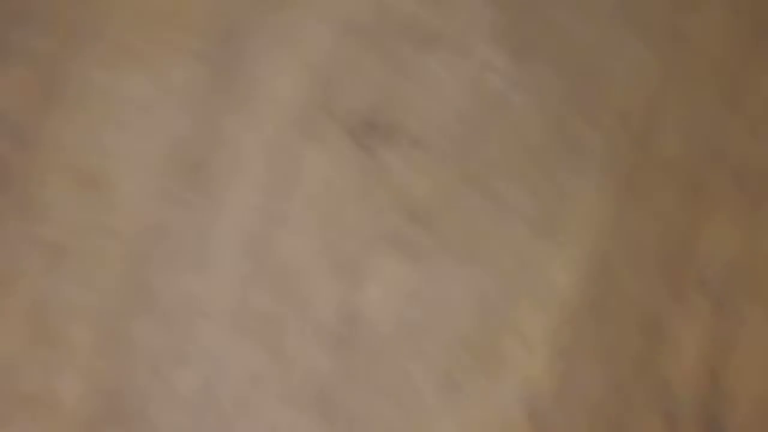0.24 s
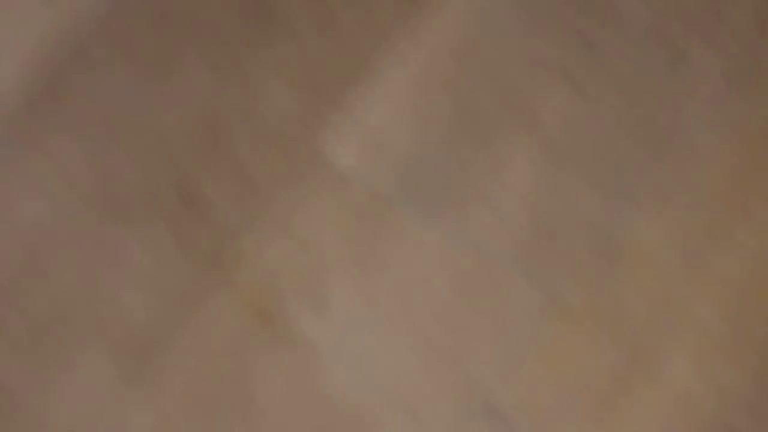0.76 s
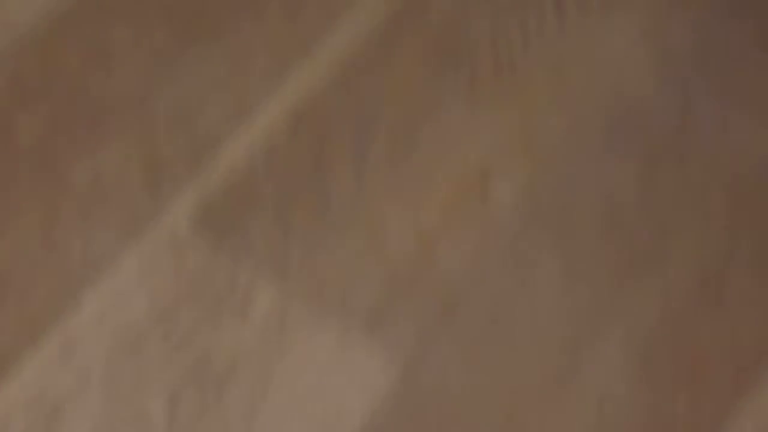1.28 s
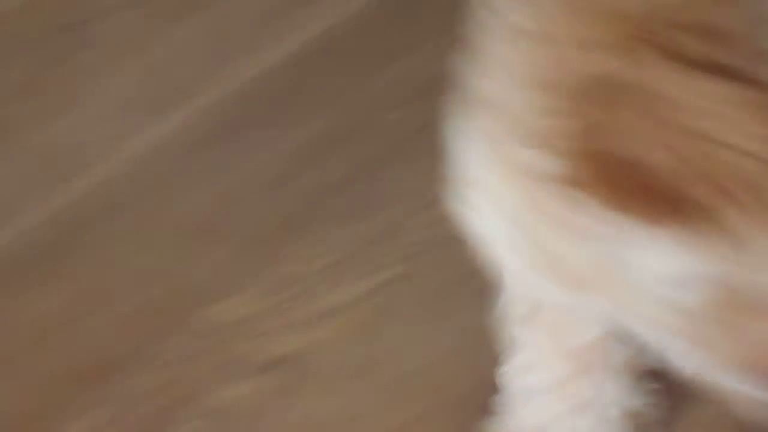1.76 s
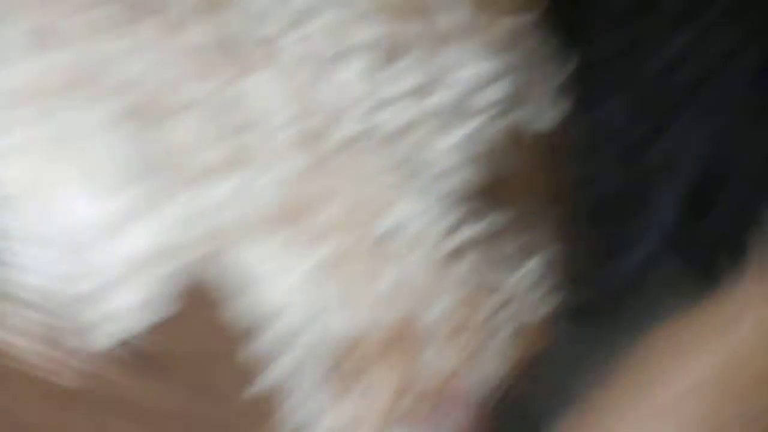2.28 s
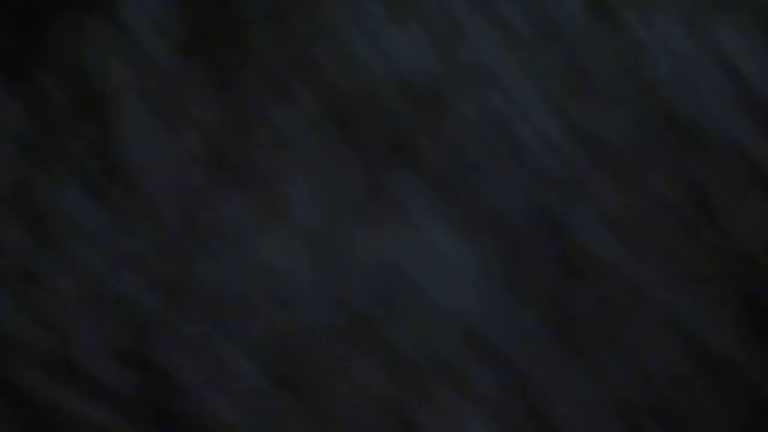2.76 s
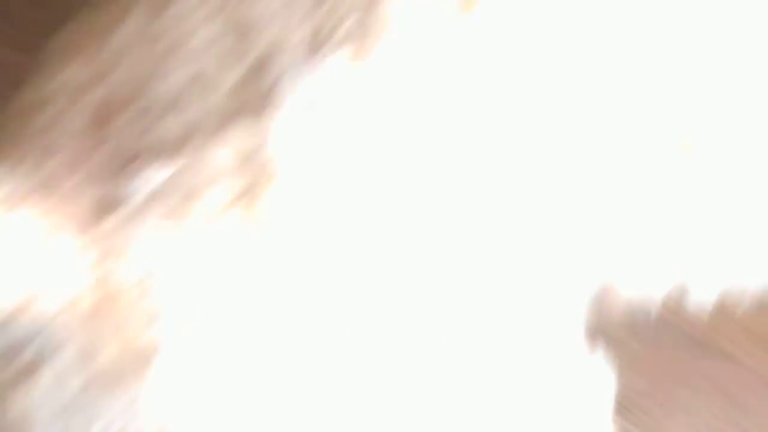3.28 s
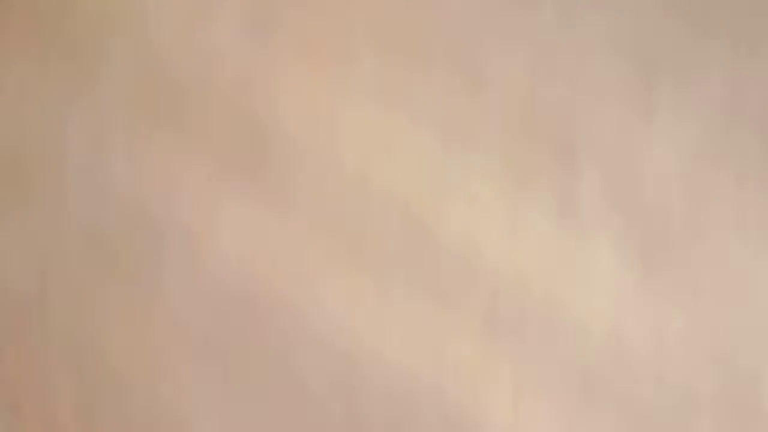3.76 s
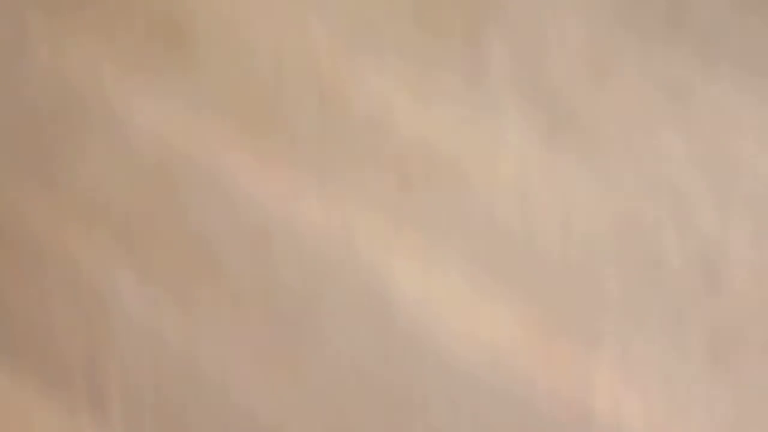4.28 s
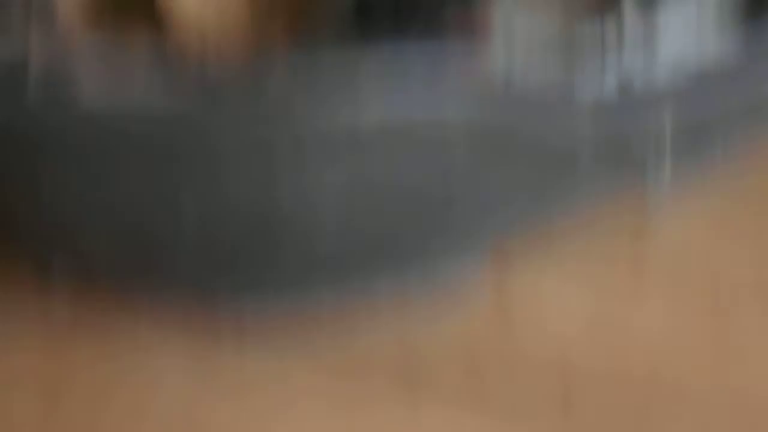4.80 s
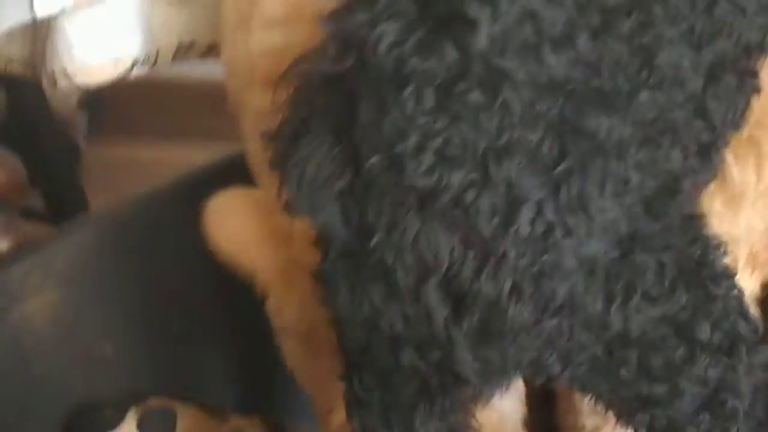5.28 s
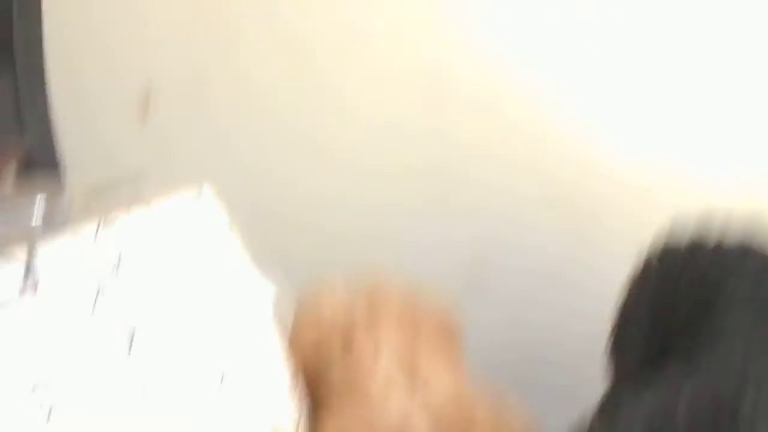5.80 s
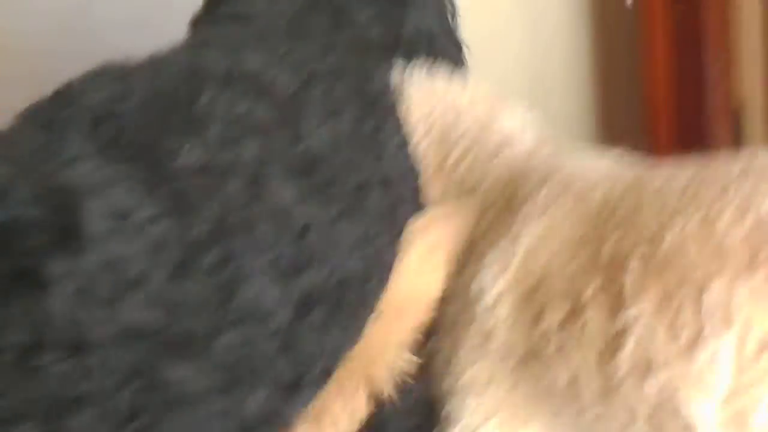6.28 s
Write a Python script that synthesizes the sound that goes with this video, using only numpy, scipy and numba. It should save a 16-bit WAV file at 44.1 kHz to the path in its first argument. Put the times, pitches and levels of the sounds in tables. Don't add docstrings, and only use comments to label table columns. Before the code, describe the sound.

In a small bare room with a wooden floor, animals play-fight close to a hand-held phone; a soft hush lies underneath. At 0-0.5 s there are light scratchy pad slides and faint taps, then a hard claw click at 0.54. Paired crisp ticks come near 0.9-1.0, with a brief lull before a firm, ringing cluster of nails and a landing pat at 1.5-1.7. From 2 to 3.2 s the chase is fullest: bright snapping clicks, squeaky short skids, fur hiss and soft paw pats, densest at 2.7-2.95. From 3.4 s bodies wrestle: dull thumps, the heaviest hollow thud near 3.8, another with a knock and claw click at 4.1, a low one at 4.2. After 4.5 it thins, with a click and tumbling bumps at 5.3-5.45, a small tick and thud at 5.66, and faint rubs and taps around 6.1-6.5.

```python
import sys
import numpy as np
from scipy import signal
from scipy.fft import rfft, irfft, next_fast_len
from scipy.io import wavfile
from scipy.ndimage import uniform_filter1d
from numba import njit

SR = 44100
rng = np.random.default_rng(int(sys.argv[2]) if len(sys.argv) > 2 else 0)


def rack_gain(trim_db):
    fader = np.asarray(trim_db, float)
    return 10 ** (fader / 20)


def output_pcm(signal):
    pcm = np.clip(np.atleast_2d(signal).T, -1, 1) * 32767
    wavfile.write(sys.argv[1], SR, np.round(pcm).astype(np.int16))


N = 288546

# (frequency [Hz], width [share of frequency], level [dB])
JOIST_MODES = [(168.9, 0.069, -1), (44.3, 0.61, -11.5), (135.7, 0.0424, -15.5)]


def unit(x):
    return x / np.sqrt(np.mean(x ** 2))


@njit
def svf(x, hz, damp):
    y, b, l = np.empty(len(x)), 0., 0.
    for i in range(len(x)):
        g = np.tan(np.pi * hz[i] / SR)
        v = (b + g * (x[i] - l)) / (1 + g * (g + damp))
        b, l, y[i] = 2 * v - b, l + 2 * g * v, damp * v
    return y


def band(x, hz, damp):
    centre = np.clip(hz + np.zeros(len(x)), 20, SR * .45)
    return svf(x, centre, float(damp))


def colour(x, points):
    hz, db = np.transpose(points)
    size = next_fast_len(len(x))
    log_f = np.log(np.arange(size // 2 + 1) * SR / size + 1)
    gain = rack_gain(np.interp(log_f, np.log(hz), db))
    return irfft(rfft(x, size) * gain, size)[:len(x)]


def ring(x, modes):
    out = 0
    for hz, db, t60 in modes:
        pole = np.exp(2j * np.pi * hz / SR - np.log(1000) / (t60 * SR))
        out = out + rack_gain(db) * signal.lfilter([1], [1, -pole], x).imag
    return out


def walk(rate):
    hold = int(SR / rate)
    steps = np.repeat(rng.standard_normal(1024), hold)[:N]
    return uniform_filter1d(steps, hold)


def grit(spread_db, flutter_db):
    size = np.minimum(rng.exponential(size=N), 5)
    return rng.standard_normal(N) * rack_gain(spread_db * size + flutter_db * walk(60))


def add(track, s, x):
    i = int(s * SR)
    track[i:i + len(x)] += x[:N - i]


def air():
    # (frequency [Hz], density [dB per Hz])
    hush_spectrum = [(25, 8), (100, 3.5), (200, 1.5), (500, 2), (2000, 1), (6000, -27), (12500, -3)]
    # (time [s], level [dB])
    load = [
        (0, -92),
        (2.93, -72),
        (4.13, -47),
        (4.52, -65),
        (5.76, -56.5),
        (5.97, -65.5),
        (6.301, -57),
        (6.54, -67),
    ]
    lower_joist_db, lower_joist_share = -62, 0.48
    hush = unit(colour(rng.standard_normal(N), hush_spectrum))
    hush = hush * rack_gain(-57.5 + 1.2 * walk(3.2))
    s, load_db = np.transpose(load)
    hum_levels = load_db, lower_joist_db + lower_joist_share * (load_db + 65)
    for (hz, width, _), db in zip(JOIST_MODES, hum_levels):
        hum = unit(band(band(rng.standard_normal(N), hz, width), hz, 30.0 * width))
        level_db = np.interp(np.arange(N) / SR, s, db)
        hush = hush + hum * rack_gain(level_db - 1.5 + 2.8 * walk(3.74))
    return hush


def swells(rows):
    t = np.arange(0, N, 64)[None] / SR
    s, db, rise_ms, fall_ms = np.transpose(rows)[:4, :, None]
    time_constants = np.where(t < s, (s - t) / rise_ms, (t - s) / fall_ms)
    return rack_gain(2 * db) * np.exp(-2000 * time_constants)


def drag():
    # (time [s], level [dB])
    shuffle = [
        (0, -52.5),
        (.6, -50),
        (2.0, -41.5),
        (3.199, -46),
        (4.3, -61),
        (5.1, -60),
        (6.0, -60),
        (6.54, -65),
    ]
    # (time of peak [s], level [dB], rise [ms], fall [ms])
    light_slides = [(0.01, -45, 11, 73), (.09, -45, 6, 90), (.215, -36.5, 10, 135), (.540, -31.5, 3, 115),
                    (.742, -37.5, 73, 230), (.906, -47, 21, 58), (.978, -37.5, 20, 280),
                    (1.233, -38, 25, 34), (1.345, -56, 25, 97), (1.526, -25.5, 2.2, 124),
                    (1.82, -35, 140, 220), (2.167, -28.5, 26, 102), (2.537, -37.5, 3.3, 850),
                    (2.722, -27.5, 8.6, 144), (2.925, -25.5, 4.5, 90), (3.091, -30, 2.9, 86),
                    (3.177, -34, 2.5, 56), (3.332, -40.5, 25, 100)]
    # (time of peak [s], level [dB], rise [ms], fall [ms], board rumble above scrape [dB])
    heavy_slides = [(3.4, -48.5, 83, 83, -10), (3.5, -44, 15, 250, 8.5), (3.763, -34.5, 140, 26, -26),
                    (3.797, -34.5, 11, 110, 3), (4.084, -32.5, 2.7, 89, 6), (4.198, -36.5, 110, 147, -1),
                    (4.525, -41, 30, 52, 0), (4.753, -40.5, 65, 58, -10), (4.965, -46.5, 11, 92, 5),
                    (5.3, -39, 3, 110, -10.5), (5.4, -47.5, 5, 140, 5), (5.625, -44, 73, 4, -8),
                    (5.66, -44, 5.5, 25, 2.5), (5.804, -47, 5.3, 80, 1.5), (6.14, -52, 5.5, 50, 1),
                    (6.194, -38.5, 23, 81, -1.5), (6.342, -47, 22, 63, -3.5), (6.5, -48, 32, 100, -9)]
    # (time of peak [s], level [dB], rise [ms], fall [ms])
    brushes = [(.104, -42, 30, 350), (.545, -39.5, 105, 78), (.742, -36.5, 58, 63), (.906, -43, 17, 120),
               (.98, -35, 11, 110), (1.233, -37.5, 130, 50), (6.342, -43, 15, 37), (1.53, -40.5, 15, 200),
               (1.664, -37, 13, 140), (2.051, -54, 32, 100), (2.167, -33, 30, 71), (2.32, -50, 34, 120),
               (2.542, -36.5, 5.5, 550), (2.726, -48, 15, 110), (2.926, -28.5, 18, 125),
               (3.095, -32, 3, 39), (3.177, -34, 2.7, 32), (3.332, -35.5, 24, 42), (3.5, -37.5, 6.7, 43),
               (3.7, -37, 45, 53), (3.78, -36.5, 39, 68), (4.1, -43, 12, 80), (4.235, -31.5, 14, 63),
               (4.526, -39.5, 20, 66), (4.753, -41, 68, 58), (5.304, -35, 3.1, 67), (5.629, -39, 93, 2),
               (6.185, -41.5, 25, 55), (4.97, -54, 12, 63), (6.5, -49.5, 26, 85)]
    # (frequency [Hz], width [share of frequency], level [dB])
    floor_bands = [(2800, 0.26, -18), (4600, 0.1, -15.5)]
    shuffle_fur_db, shuffle_board_db, light_board_db = -3, -6, -19
    nearing_db_per_s = 2.5

    t = np.arange(0, N, 64) / SR
    bed = rack_gain(2 * np.interp(t, *np.transpose(shuffle)))
    light, heavy = swells(light_slides).sum(axis=0), swells(heavy_slides)
    rumble = (heavy * rack_gain(2 * np.array(heavy_slides)[:, -1:])).sum(axis=0)
    pad_power = bed + light + heavy.sum(axis=0)
    fur_power = bed * rack_gain(2 * shuffle_fur_db) + swells(brushes).sum(axis=0)
    board_power = bed * rack_gain(2 * shuffle_board_db) + rumble
    board_power = board_power + light * rack_gain(2 * (light_board_db + nearing_db_per_s * t))
    pad_gain, fur_gain, board_gain = (np.interp(np.arange(N) / 64, np.arange(len(p)), np.sqrt(p))
                                      for p in (pad_power, fur_power, board_power))
    board_db = 20 * np.log10(board_gain / pad_gain)
    hz = 2700 * rack_gain(-.15 * (board_db + 16.0) + 0.98 * walk(14))
    slips = grit(spread_db=1.5, flutter_db=2.5)
    scrape = unit(band(band(slips, hz, 1.0), hz, 1.72))
    for floor_hz, width, db in floor_bands:
        scrape = scrape + rack_gain(db) * unit(band(slips, floor_hz, width))
    fur = unit(band(band(grit(spread_db=3.0, flutter_db=2.5), 6760, 1.0), 10000, 7.9))
    board = unit(band(band(grit(spread_db=1.5, flutter_db=3.5), 783, 0.99), 505, 2.6))
    return pad_gain * unit(scrape) + fur_gain * fur + board_gain * board


def claws():
    # (time [s], peak level [dB], centre [Hz], room share [dB])
    strikes = [(.537, -5.5, 3700, -31), (0.8966, -12, 4100, -9), (0.9117, -9, 5560, -11.5),
               (.9657, -9, 4800, -11.5), (.978, -12.5, 5360, -9), (1.4748, -11, 9250, -7.5),
               (1.496, -13.5, 5340, -16), (1.5222, -5, 4170, -9), (1.532, -13, 3940, -6),
               (1.6537, -7, 6050, -12.5), (1.6565, -3, 5900, -16), (1.9053, -15, 7940, -8.5),
               (2.0425, -13.5, 5430, -12), (2.1228, -4, 7460, -10), (2.1624, -13, 3300, -1.5),
               (2.5316, -10, 8300, -17), (2.5356, -3.5, 7400, -17), (2.5925, -12, 6200, -7),
               (2.7181, -4, 8100, -8), (2.7213, -1.5, 7000, -14), (2.756, -13, 7100, -19),
               (2.7994, -13.5, 3900, -1), (2.9124, -27.5, 5100, -14), (2.9258, -3.5, 6730, -28),
               (3.1735, -10.5, 6500, -15), (3.7513, -10.5, 4800, -20), (4.0807, -14, 2270, -2.5),
               (5.296, -13, 4900, -10.5), (5.6608, -13, 6500, -39), (6.0998, -20.5, 6160, -37)]
    # (time [s], peak level [dB], centre [Hz])
    taps = [(.087, -23.5, 3730), (0.2094, -30, 3350), (0.495, -14.5, 4440), (0.5401, -16.5, 3370),
            (0.906, -29, 3970), (.914, -20, 4820), (1.3356, -18.5, 5370), (1.349, -25, 5530),
            (1.66, -11.5, 4560), (1.826, -28, 3080), (2.3188, -16.5, 7500), (2.44, -17.5, 9100),
            (2.6652, -13, 5010), (3.0883, -12.5, 2600), (3.095, -11, 6400), (3.1782, -12, 3530),
            (3.4985, -16, 3410), (3.6335, -20.5, 3320), (3.7812, -20, 2400), (3.9533, -20.5, 3700),
            (3.9782, -16.5, 3800), (4.0508, -15.5, 4300), (2.9228, -13, 8500), (5.2400, -29.5, 6370),
            (5.8028, -30, 3360), (6.131, -20.5, 2760), (6.143, -28, 3250), (6.2005, -30, 4040),
            (6.404, -24, 9000), (6.4962, -31, 4760)]
    # (time [s], peak level [dB], centre [Hz])
    flicks = [(2.4, -33, 6100), (2.347, -18, 8000), (3, -24, 9000), (3.917, -31, 6800), (5.1065, -36, 6500),
              (4.5199, -28, 5400), (2.9283, -11, 3600), (5.0985, -41, 8900), (5.1102, -34.5, 2600),
              (5.9, -42, 8000), (5.299, -17, 6700), (5, -25, 3800), (5.642, -31, 4400), (2.8, -15, 4500),
              (1.5346, -12, 4100)]
    tick_ms = 1.14
    rows = [(*r, -3) for r in strikes]
    rows += [(*r, -7, -4) for r in taps]
    rows += [(*r, -20, 0) for r in flicks]

    near, feed, t = np.zeros(N), np.zeros(N), np.arange(1024) / SR
    for (s, db, hz, wet_db, near_db), chatter in zip(rows, rng.standard_normal((len(rows), 1024))):
        hit = chatter * np.exp(-t * 1000 / tick_ms) * np.minimum(t / 0.000095, 1)
        nail = band(band(hit, hz, 1.0), hz, 2.5)
        edge = np.diff(hit * np.exp(-t / 0.00058), prepend=0)
        board = band(band(hit, 2300, 0.47), 1560, 3.4)
        tick = nail + rack_gain(-14 + 8.2 * np.log2(hz / 4000)) * edge
        tick += rack_gain(-3.5 - 1.6 * np.log2(hz / 2500)) * board
        tick /= abs(tick).max()
        snap = band(np.exp(-t / .00004), hz, 2.5) + .15 * tick
        add(near, s - .0005, rack_gain(db + near_db) * tick)
        add(feed, s - .0005, rack_gain(db + wet_db + 5.5) * snap / abs(snap).max())
    return near, feed


def skids():
    # (time of peak [s], level [dB], centre [Hz], rise [ms], fall [ms])
    singing_skids = [(.105, -36.5, 3180, 14, 12), (.235, -32.5, 3040, 27, 24), (.27, -45.5, 1020, 37, 55),
                     (6.178, -42, 9600, 6, 40), (.55, -36, 4400, 10, 70), (0.819, -36.5, 2800, 16, 28),
                     (1.08, -34.5, 2320, 4.9, 25), (1.535, -25.5, 4500, 6.1, 45),
                     (1.545, -30, 2770, 10, 46), (1.835, -38, 2800, 15, 220), (4.24, -35, 4370, 18, 52),
                     (2.171, -23.5, 3250, 22, 19), (2.831, -32.5, 1040, 11, 19),
                     (2.912, -23.5, 4400, 2, 12), (2.987, -32, 9650, 7.7, 18), (3.551, -30, 1410, 8, 13),
                     (4.526, -38.5, 3500, 17, 43), (4.75, -39.5, 4140, 43, 8.6),
                     (4.959, -43.5, 1690, 6.6, 41), (5.43, -36, 720, 20, 76), (5.668, -37.5, 5400, 9, 1.4),
                     (5.615, -36, 6960, 35, 6.5), (6.2, -41.5, 674, 33, 60), (6.505, -47, 3560, 4.8, 8.2),
                     (4.11, -39, 4700, 10, 70), (5.31, -43, 3300, 7.4, 50), (5.59, -46, 3600, 22, 18),
                     (1.2, -41, 6900, 50, 25), (4.52, -42.5, 5100, 15, 30)]
    out, t = np.zeros(N), (np.arange(12288) - 4096) / SR
    rubs = rng.standard_normal((len(singing_skids), 12288))
    for (s, db, hz, rise_ms, fall_ms), rub in zip(singing_skids, rubs):
        swell = np.exp(np.where(t < 0, t / rise_ms, -t / fall_ms) * 1000)
        centre = hz * (1 - .45 * t)
        tone = unit(band(band(rub, centre, .25), centre, .55))
        add(out, s + t[0], rack_gain(db) * swell * tone)
    return out


def thumps():
    # (time [s], peak level [dB], centre [Hz], push [ms])
    pats = [
        (.243, -39, 1080, 12),
        (.465, -37.5, 594, 47),
        (1.524, -26, 1110, 47),
        (2.155, -28, 563, 21),
        (2.52, -31, 603, 38),
        (2.711, -25, 513, 12),
        (2.816, -27, 895, 30),
        (2.918, -41, 890, 23),
        (2.967, -39, 590, 17),
        (3.0883, -28, 1050, 19),
    ]
    # (time [s], peak level [dB], centre [Hz], joist ring [dB], push [ms])
    body_thumps = [(3.248, -30, 610, -17, 34), (3.472, -25.5, 650, -14, 28), (3.539, -19, 686, -18, 47),
                   (3.789, -20.5, 300, -16, 15), (3.804, -14.5, 405, -6, 24), (4.082, -18, 794, -16, 52),
                   (4.203, -22.5, 300, -8.5, 21), (4.498, -31.5, 450, -21, 15), (4.72, -47.5, 544, -12, 26),
                   (4.816, -43.5, 466, -26, 31), (4.952, -33.5, 420, -6, 27), (5.298, -28, 1230, -37, 41),
                   (5.391, -25, 650, -30, 15), (5.409, -29, 690, -8, 35), (5.654, -31.5, 530, -0.5, 12),
                   (5.801, -33.5, 1090, -18, 42), (6.11, -46, 250, -2.5, 75), (6.13, -35.5, 765, -21, 48),
                   (6.19, -32.5, 666, -22, 37), (6.289, -35.5, 547, -9, 31), (6.491, -41.5, 660, -38, 13),
                   (3.828, -30.5, 400, 1, 28), (4.216, -30, 383, -3, 28)]
    # (frequency [Hz], level [dB], decay time t60 [s])
    board_modes = [(270, 13, 0.03), (420, 2.5, 0.078), (548, -5, 0.18), (576, 1.5, 0.056), (657, 1, 0.025),
                   (790, 4, 0.02), (923, -21, 0.016), (1180, -7, 0.035)]
    pat_joist_db, room_db = -55, -6.5
    rows = [(s, db, hz, pat_joist_db, ms) for s, db, hz, ms in pats]
    rows += [tuple(r) for r in body_thumps]

    near, feed, t = np.zeros(N), np.zeros(N), np.arange(8192) / SR
    for (s, db, hz, joist_db, ms), shake in zip(rows, rng.standard_normal((len(rows), 8192))):
        push = shake * np.exp(-t * 1000 / ms) * np.minimum(t * hz / 1.2, 1)
        body = band(band(push, hz, .6), hz, 1.1)
        board = unit(ring(body, board_modes)) + rack_gain(7.5) * unit(body)
        board *= rack_gain(db) / abs(board).max()
        shove = np.exp(-t / .0012) + .1 * push
        joist = sum(rack_gain(g) / w * band(band(shove, f, w), f, 6.8 * w) for f, w, g in JOIST_MODES)
        add(near, s - .002, board + rack_gain(db + joist_db + 4.0) * joist / abs(joist).max())
        add(feed, s - .002, rack_gain(room_db) * board)
    return near, feed


def pings():
    # (time [s], peak level [dB], frequency [Hz])
    nail_notes = [(.5365, -14, 2180), (.5368, -16, 3940), (.8955, -23, 4370), (3.751, -21.5, 4600),
                  (3.953, -28.5, 3900), (4.0505, -23.5, 4470), (6.1305, -33, 2900), (6.141, -35, 8000),
                  (6.277, -39, 10200), (6.332, -39, 8500), (6.403, -34, 9000), (2.5925, -22, 4500),
                  (.9112, -21, 10200), (.9649, -17, 4620), (.9774, -21, 4570), (1.4746, -18, 10160),
                  (1.5218, -8.5, 4220), (1.5234, -22, 2360), (1.528, -15.5, 1960), (1.5323, -15, 3960),
                  (1.5343, -16.5, 2800), (1.6533, -18, 9220), (1.6558, -10.5, 4600), (1.656, -13, 6800),
                  (1.9046, -21, 9090), (2.0417, -22.5, 6200), (2.1221, -17, 9100), (2.5304, -20, 9900),
                  (2.5349, -21, 9090), (2.5349, -25, 7600), (2.594, -25, 9000), (2.7173, -14, 8400),
                  (2.7207, -14, 8740), (2.7241, -13, 2240), (2.7564, -17.5, 10100), (2.9217, -14.5, 9400),
                  (2.924, -24, 5000), (2.9261, -11, 6590), (2.927, -14, 9670), (2.9295, -14, 4050),
                  (2.9335, -20, 3470), (2.9405, -17.5, 2400), (2.9497, -20, 4450), (3.173, -24, 9740),
                  (3.179, -17, 2900), (3.495, -32, 9500), (3.5015, -30, 9350), (3.7513, -24, 7600),
                  (3.7805, -20, 1840), (4.0803, -17, 3380), (4.0805, -9.5, 1940), (4.1025, -22, 4800),
                  (4.402, -40.5, 10000), (5.0985, -43, 7140), (5.243, -37.5, 3300), (5.2952, -22, 3840),
                  (5.2952, -24, 9800), (5.66, -26, 8750), (5.6602, -24.5, 1760)]
    # (time [s], peak level [dB], frequency [Hz])
    knocks = [(2.8171, -26, 875), (2.8286, -24.5, 1270), (3.092, -23.5, 820), (3.5459, -24, 1080),
              (3.5519, -20.5, 574), (3.7934, -17, 322), (3.8014, -23, 1100), (3.803, -11, 300),
              (3.8088, -23, 1080), (3.8178, -13.5, 390), (4.0837, -15, 865), (4.0922, -17.5, 650),
              (4.0942, -22, 1050), (4.0997, -22, 950), (4.1017, -16.5, 520), (4.1126, -27, 1230),
              (5.3917, -21.5, 694), (5.4007, -23, 650), (5.4107, -19.5, 650), (5.423, -23.5, 780),
              (5.4331, -27, 790), (5.4396, -25, 617), (5.46, -32, 630), (3.8265, -19, 330),
              (3.842, -21, 420), (4.2079, -23, 242), (4.219, -26, 398), (4.23, -27, 350), (6.188, -35, 650),
              (6.204, -32, 720), (6.222, -35, 620), (4.9582, -29.5, 342), (5.4705, -31, 670),
              (5.488, -31, 760), (5.8018, -33, 1060)]
    # (time [s], peak level [dB], frequency [Hz])
    jolts = [(1.56, -57, 60), (2.8, -53, 90), (3.28, -54, 48), (3.8, -44, 50.6), (4.08, -52, 50),
             (4.23, -48, 50), (4.72, -47, 50.3), (5.07, -58, 55), (5.4, -45, 50), (5.66, -49, 50),
             (6.28, -60, 50)]
    near, feed, t = np.zeros(N), np.zeros(N), np.arange(8192) / SR
    # contacts, decay [ms], room share [dB]
    for rows, ms, wet_db in ((nail_notes, 0.98, -15), (knocks, 2.33, -15), (jolts, 35, -60)):
        shape = np.exp(-t * 1000 / ms) * (1 - np.exp(-t * 4000 / ms))
        for s, db, hz in rows:
            note = rack_gain(db) * shape / shape.max() * np.sin(2 * np.pi * hz * t)
            add(near, s, note)
            add(feed, s, rack_gain(wet_db) * note)
    return near, feed


def room(x):
    # (band centre [Hz], decay time t60 [s], level [dB])
    wall_bands = [(250, 0.44, 10), (650, 0.49, -0.5), (1650, 0.28, 4.5), (2900, 0.41, 2.5),
                  (5560, 0.12, -6), (11600, 0.25, 7)]
    t = np.arange(int(SR * .7)) / SR
    tail = 0
    for hz, t60, db in wall_bands:
        echoes = band(rng.standard_normal(len(t)), hz, 0.96)
        tail = tail + rack_gain(db - 60 * t / t60) * echoes
    tail *= np.clip((t - .002) / 0.0016, 0, 1)
    return signal.fftconvolve(x, tail / np.sqrt(np.sum(tail ** 2)))[:N]


def scene():
    scrape = drag() + skids()
    tick, tick_feed = claws()
    thump, thump_feed = thumps()
    ping, ping_feed = pings()
    wet = room(ping_feed + rack_gain(7) * tick_feed + rack_gain(-3.5) * thump_feed + rack_gain(-15) * scrape)
    return (scrape + tick + ping + thump + wet + air())[None]


def low_pass(x):
    return signal.sosfilt(signal.butter(12, 12940, fs=SR, output="sos"), x)


def record(dry):
    # (frequency [Hz], level [dB])
    mic_response = [(30, -3), (9800, 0), (10600, -3), (11200, -17), (12000, -13), (12500, -55),
                    (12900, -52), (13400, -70)]
    mix = colour(dry[0], mic_response)[None]
    return low_pass(mix)


dry = scene()
out = record(dry)
output_pcm(out)
```